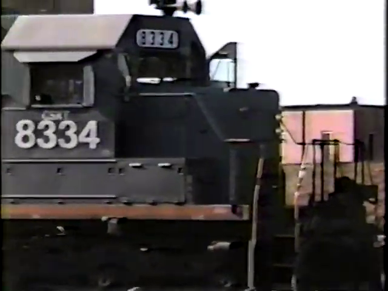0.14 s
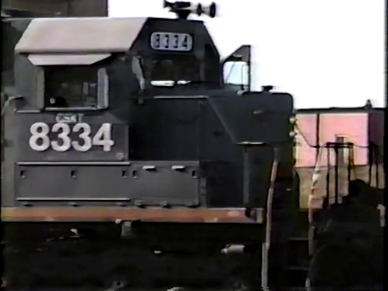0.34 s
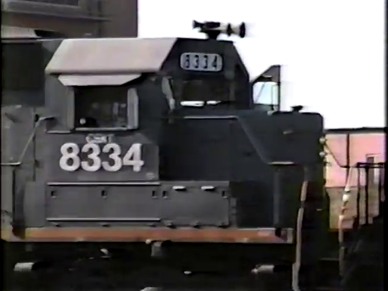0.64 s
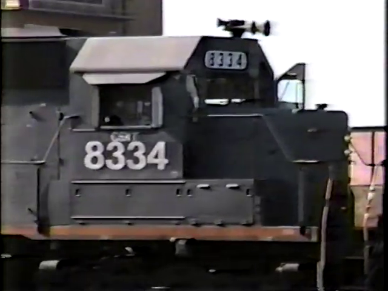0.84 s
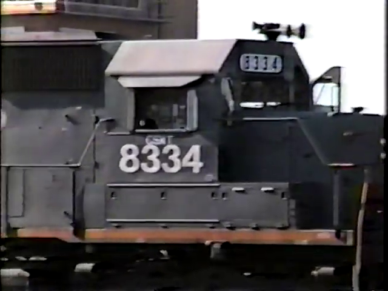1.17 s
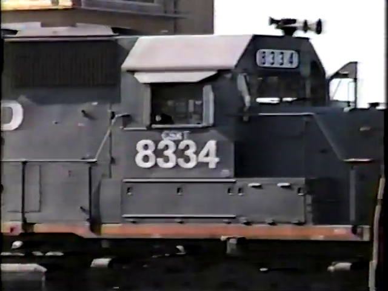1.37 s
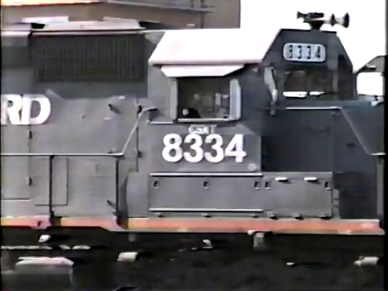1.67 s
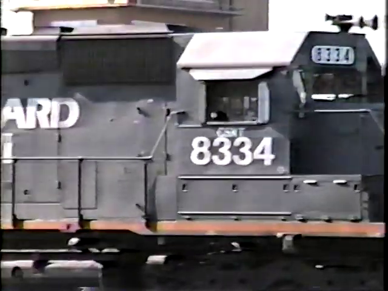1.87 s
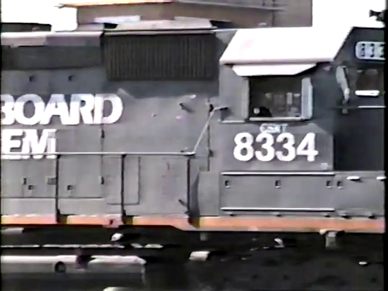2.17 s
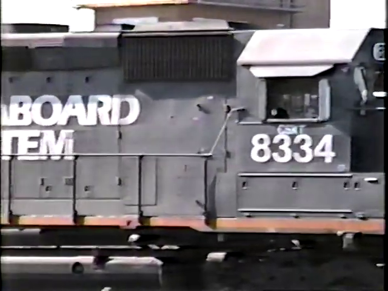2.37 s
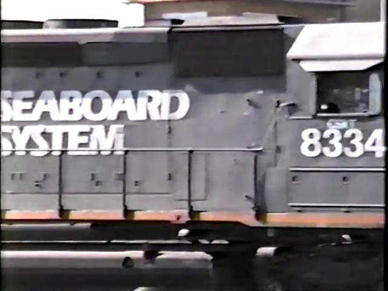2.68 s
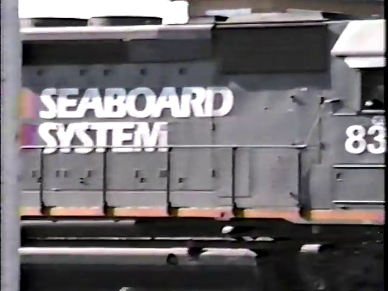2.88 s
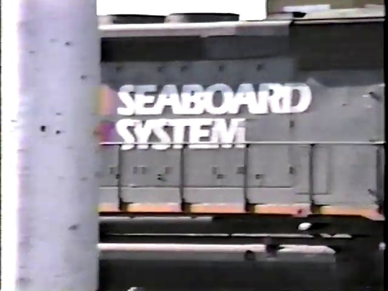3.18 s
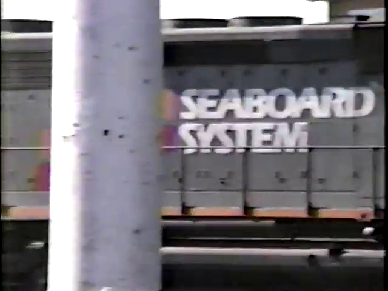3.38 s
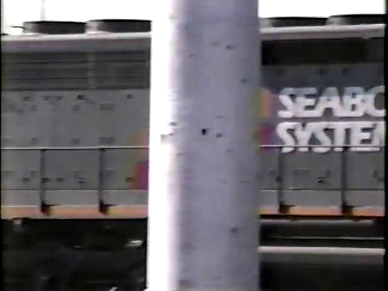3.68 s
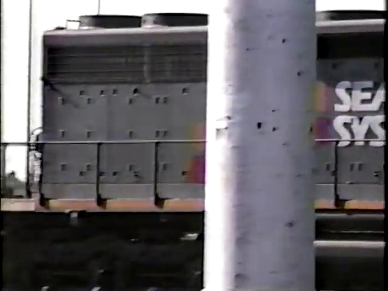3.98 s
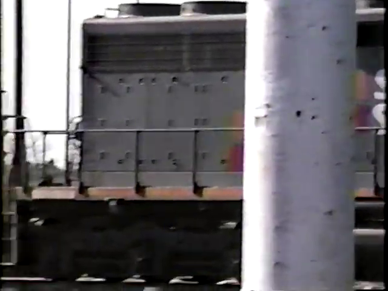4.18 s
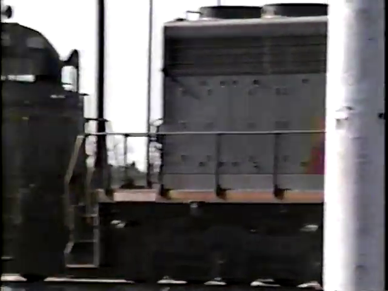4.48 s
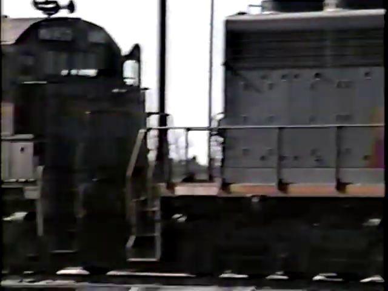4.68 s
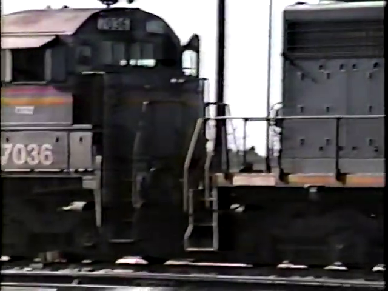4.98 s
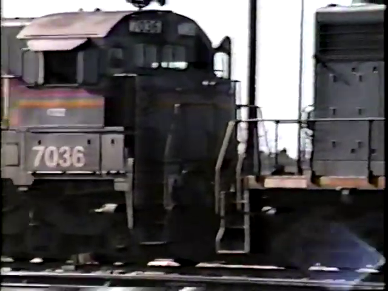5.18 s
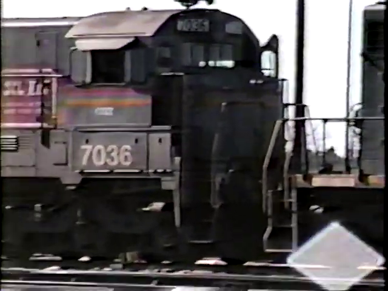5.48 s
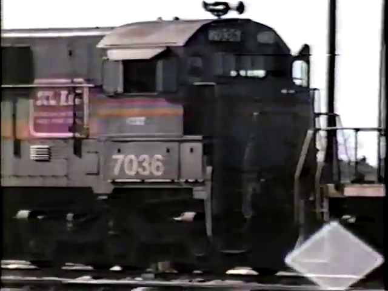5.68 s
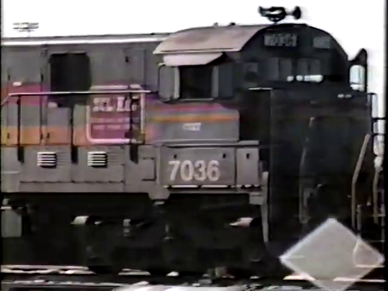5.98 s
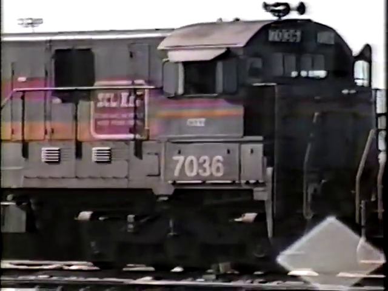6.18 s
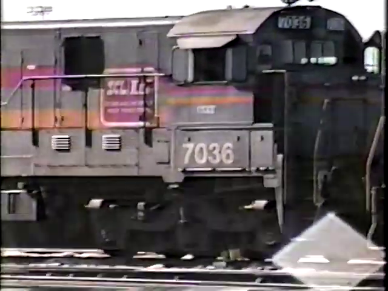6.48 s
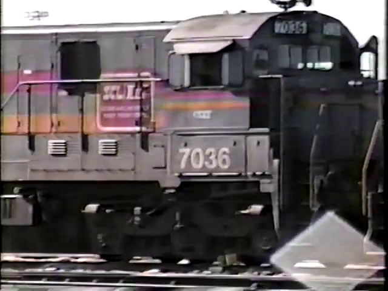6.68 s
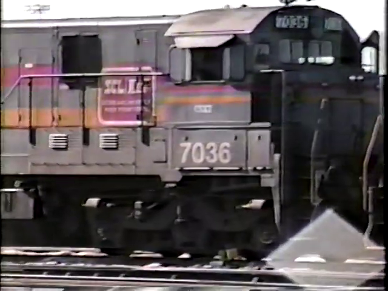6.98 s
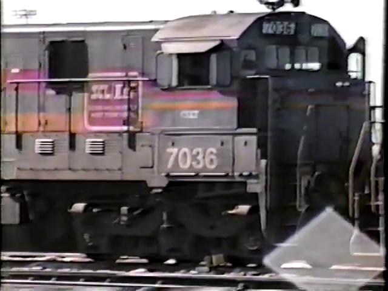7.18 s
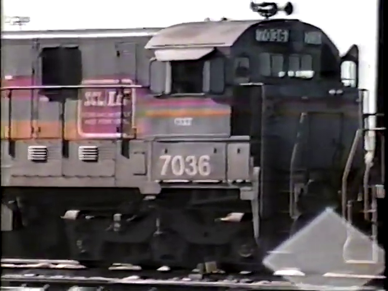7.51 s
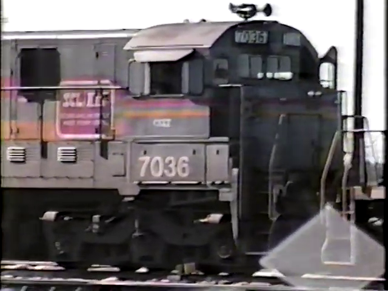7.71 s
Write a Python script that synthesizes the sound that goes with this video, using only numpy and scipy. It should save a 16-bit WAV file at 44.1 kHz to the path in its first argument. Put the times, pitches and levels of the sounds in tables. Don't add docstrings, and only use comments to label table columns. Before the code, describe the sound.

Steady rattling engine roar and throbbing turbine-like whine from idling diesel locomotives, with hissing air, a brief sputtering puff and sparse valve ticks.

```python
import sys
import numpy as np
from scipy import signal
from scipy.fft import rfft, irfft, next_fast_len
from scipy.io import wavfile
from scipy.ndimage import uniform_filter1d, map_coordinates

SR = 44100
rng = np.random.default_rng(int(sys.argv[2]) if len(sys.argv) > 2 else 0)


def store_pcm(level_fs):
    pcm = np.round(np.clip(level_fs, -1, 1) * 32767).astype(np.int16)
    wavfile.write(sys.argv[1], SR, np.atleast_2d(pcm).T)


def level_to_linear(level):
    exponent = np.asarray(level, float) / 20
    return 10 ** exponent


N = 346185
T = np.arange(N) / SR
SHAFT_HZ = 4.171


def unit(x):
    return x / np.sqrt(np.mean(np.abs(x) ** 2) + 1e-20)


def curves(rows):
    s, *cols = np.transpose(rows)
    return [np.interp(T, s, c) for c in cols]


def bumps(times, widths):
    return np.exp(-((T - np.c_[times]) / np.c_[widths]) ** 2)


def wobble(rate):
    knots = rng.standard_normal(int(N * rate / SR) + 4)
    return map_coordinates(knots, [T * rate])


def noise(spectrum, repeat=0):
    m = next_fast_len(N + SR)
    hz = np.fft.rfftfreq(m, 1 / SR)
    f, db = np.transpose(spectrum)
    colour = level_to_linear(np.interp(np.log(hz + 1), np.log(f + 1), db, -120, -120))
    comb = 1 / (1 - np.clip(repeat, 0, .97) * np.exp(-2j * np.pi * hz / SHAFT_HZ))
    white = rfft(rng.standard_normal(m))
    return unit(irfft(white * colour * comb, m)[:N])


def blur(width_hz):
    return unit(wobble(width_hz) + 1j * wobble(width_hz))


def line(hz, db, gain):
    return level_to_linear(db) * np.sqrt(2) * np.real(gain * np.exp(2j * np.pi * hz * T))


# (time [s], engine effort [dB], air leak pressure [dB])
YARD_EFFORT = [(0, 0, 0.5), (.7, 1, 1), (1.24, 0, -1), (1.71, .5, 2), (2.19, -.5, -0.5), (3.5, -.5, 0),
               (3.8, -0.5, -4), (4.1, 0, -1.5), (5.1, 0.5, -1), (5.5, 0.5, -1), (6.43, 1, 3.5),
               (6.6, -.5, -1.5), (7.26, 2, 2), (7.85, 1.5, -0.5)]


def engine():
    effort_db, leak_db = curves(YARD_EFFORT)
    moving = shaft(effort_db) + roar(effort_db) + fans(effort_db, leak_db)
    return exhaust(effort_db) + moving + leaking_air(leak_db)


# (frequency [Hz], level [dB per Hz])
EXHAUST_COLOUR = [(13, -50.5), (22, -29), (75, -0.5), (156, -2.5), (204, -6), (261, -5), (368, -6),
                  (452, -7.5), (470, -1), (610, -31), (1030, -120)]
# (time [s], extra level [dB], half width [s])
EXHAUST_BEATS = [
    (.35, 2.5, .05),
    (1.19, 1.5, 0.046),
    (3.21, 3.5, .05),
    (3.39, 4.5, .05),
    (4.9, 1, .05),
    (5.68, 2.5, .05),
    (6.6, 4, .12),
    (7.6, -1.5, 0.25),
]


def exhaust(effort_db):
    s, beat_db, half_width = np.transpose(EXHAUST_BEATS)
    level_db = -38 - .3 * effort_db + beat_db @ bumps(s, half_width)
    return level_to_linear(level_db) * (noise(EXHAUST_COLOUR) + level_to_linear(-5) * noise(EXHAUST_COLOUR, repeat=.85))


# (frequency [Hz], level [dB per Hz])
BLOCK_COLOUR = [(200, -58.5), (250, -15.5), (320, -17), (478, -15.5), (490, -2.5), (600, -2.5), (645, -2.5),
                (690, -3.5), (725, -0.5), (745, -6.5), (790, -3), (830, -11), (980, -16), (1100, -20),
                (1400, -40)]


def shaft(effort_db):
    turning = level_to_linear(-30 + .8 * effort_db) * noise(BLOCK_COLOUR, repeat=.92) + gears()
    hunting = T + .00022 * wobble(2.6)
    return map_coordinates(turning, [hunting * SR], mode="nearest")


# (frequency [Hz], level [dB rms], smear width [Hz], steady share)
GEAR_LINES = [(404, -51, 0.92, 1.2), (991, -45, 6, 0.96), (1190, -45, 7, 0.34), (1500, -48, 10, 0.33),
              (1637, -40, 25, .2), (1671, -43.5, 18, 0.17), (3550, -48.5, 50, .1)]


def gears():
    turns = 2 * np.pi * SHAFT_HZ * T
    cam_teeth, runout = 158, 1.1
    cam = level_to_linear(-35.5) * np.sqrt(2) * np.sin(cam_teeth * turns + runout * np.sin(turns))
    throb = 1 + .7 * np.cos(np.pi * SHAFT_HZ * (T - .2))
    out = cam + throb * line(493, -43, unit(2 + blur(3)))
    for hz, db, width, steady in GEAR_LINES:
        out += line(hz, db, unit(steady + blur(width)))
    return out


# (frequency [Hz], level [dB per Hz])
ROAR_COLOUR = [(380, -51.5), (476, -10.5), (495, -6), (800, -2.5), (900, -1), (1300, 0.5), (1800, -1.5),
               (2050, 2.5), (2150, 8), (2260, 1.5), (2500, -22.5), (3000, -50)]


def roar(effort_db):
    return level_to_linear(-25.5 + .8 * effort_db + .67 * wobble(7.5)) * noise(ROAR_COLOUR)


# (frequency [Hz], level [dB per Hz])
FAN_COLOUR = [(1350, -24.5), (2300, -4.5), (2460, -5), (2930, -8.5), (3460, -10), (4070, -12.5),
              (4400, -11), (4700, -24), (6110, -46), (10300, -120)]


def fans(effort_db, leak_db):
    level_db = -32.5 + .73 * effort_db + .3 * leak_db + .67 * wobble(9)
    return level_to_linear(level_db) * noise(FAN_COLOUR)


# (frequency [Hz], level [dB per Hz])
AIR_COLOUR = [(2650, -29), (4500, -4.5), (4660, -3.5), (5350, -10.5), (7080, -14.5), (8020, -23.5),
              (10500, -36), (13600, -64), (22000, -120)]


def leaking_air(leak_db):
    return level_to_linear(-46 + leak_db + .77 * wobble(7)) * noise(AIR_COLOUR)


# (time [s], load [dB], steady tone between swells relative to load [dB], octave relative to load
# [dB])
BLOWER_LOAD = [(0, -23.5, -19, -27), (.55, -24, -11, -20.5), (.8, -22.5, -12, -18.5),
               (1.3, -26.5, -8, -23.5), (1.8, -25, -9, -18), (2.2, -25.5, 1, -20), (2.7, -24.5, -12, -21),
               (3.2, -24.5, -15, -17), (3.7, -27.5, -3, -22.5), (4.2, -27.5, -6, -22), (4.5, -25, -6, -23),
               (5, -30, -11, -23), (5.35, -27.5, -15, -21), (5.8, -32.5, 6, -13.5), (6.3, -26, -0.5, -16.5),
               (6.9, -27, 2, -19.5), (7.45, -25.5, -5.5, -21), (7.85, -22, 2, -21)]


def whine():
    load_db, lull_db, octave_db = curves(BLOWER_LOAD)
    first_s, turn_s, swell_s = .074, .2402, .135
    count = int(N / SR / turn_s) + 2
    chance = rng.standard_normal((count, 2))
    middle = first_s + turn_s * np.arange(count) + .004 * chance[:, 0]
    turn = np.round((T - first_s) / turn_s).astype(int)
    since_s = T - middle[turn]
    u = since_s / swell_s
    loaded = 1 / (1 + (2 * u) ** 6)
    climb = uniform_filter1d(np.where(np.abs(u + .05) < .7, u, 0), size=400)
    mesh_hz = 2175 + 1.4 * T + 36 * climb + 5 * wobble(30)
    angle = 2 * np.pi * np.cumsum(mesh_hz) / SR
    quarters = 1 - (.38 - .025 * T) * np.cos(8 * np.pi * SHAFT_HZ * (since_s + .005))
    mesh_rough = unit(1 + .25 * blur(50))
    octave_rough = unit(1 + .75 * blur(110))
    lull = level_to_linear(load_db + lull_db - 2.5) * (1 - loaded) * unit(.96 + blur(60)) * np.exp(2j * np.pi * 2182 * T)
    mesh = level_to_linear(load_db + .5 + .8 * chance[turn, 1]) * loaded * quarters * mesh_rough
    bites = .15 + 1.35 * np.exp(-((u + .16) / .2) ** 2) + .9 * np.exp(-((u - .24) / .17) ** 2)
    octave = level_to_linear(load_db + octave_db + 3) * bites * octave_rough
    whole = mesh * np.exp(1j * angle) + lull + octave * np.exp(1j * 1.981 * angle)
    return np.sqrt(2) * np.real(whole)


# (frequency [Hz], level [dB per Hz])
HISS_COLOUR = [(5000, -25), (8500, -2.5), (9880, -10.5), (15200, -8.5), (15730, -10), (15760, -120)]
# (frequency [Hz], level [dB rms])
SCAN_WHISTLES = [(8629, -81.5), (9351, -84), (10072, -83), (10788, -79.5), (11509, -81.5), (12225, -81),
                 (12586, -91), (12947, -85), (13668, -86.5), (14029, -89), (14384, -86), (15106, -87.5),
                 (15466, -83), (15735, -82.5)]


def camera_noise():
    out = level_to_linear(-65.5) * noise(HISS_COLOUR)
    for hz, db in SCAN_WHISTLES:
        out += line(hz, db, unit(4 + blur(6)))
    return out


# (frequency [Hz], level [dB per Hz])
NOZZLE_COLOUR = [(2200, -33), (2700, 3), (3300, -1), (3900, 4), (4600, -1.5), (5200, -6), (5500, -16),
                 (7500, -23), (9000, -36.5)]
# (time [s], rush [dB], bright hiss [dB], half width [s])
AIR_PUFFS = [
    (.07, -41, -54, .04),
    (.375, -42, -43, .01),
    (.5, -32.5, -46, 0.033),
    (.58, -36, -45, 0.01),
    (.72, -48, -52, .04),
]


def air_line():
    def passed(s, soft_s):
        return .5 + .5 * np.tanh((T - s) / soft_s)

    cut_s = .59
    snapped = passed(cut_s, .008)
    build_db = -32 + 38 * np.minimum(T - cut_s, 0)
    build = level_to_linear(build_db) * passed(.22, .04) * (1 - snapped)
    linger = level_to_linear(-43) * snapped * (1 - passed(.67, .03))
    flow = build + linger
    s, rush_db, bright_db, half_width = np.transpose(AIR_PUFFS)
    puffs = bumps(s, half_width)
    rush = level_to_linear(1.5 * wobble(40)) * (flow + level_to_linear(rush_db) @ puffs) * noise(NOZZLE_COLOUR)
    bright = (level_to_linear(-17) * flow + level_to_linear(bright_db) @ puffs) * noise(AIR_COLOUR)
    return rush + bright


# (time [s], peak level [dB], pitch [Hz])
VALVE_TICKS = [(0.5893, -27, 2880), (1.1044, -25.5, 2720), (3.5832, -34, 2930), (4.0078, -24, 2720),
               (4.272, -26, 2910), (5.044, -26, 2760), (5.061, -18.5, 2780), (5.3226, -25, 2860),
               (5.8527, -25, 2740), (6.108, -24, 2770), (6.6386, -23.5, 2780)]
# (time [s], peak level [dB], pitch [Hz])
FITTING_CLINKS = [
    (.49, -29, 5010),
]
# (ratio to the tick's pitch, level [dB])
CAP_MODES = [(.84, -3), (.89, 0), (.97, -5), (1, 1.5), (1.035, -5), (1.07, -10.5)]


def valve():
    events = [*VALVE_TICKS, *FITTING_CLINKS]
    out, t = np.zeros(N + SR), np.arange(SR // 5) / SR
    chance = rng.standard_normal((len(events), len(CAP_MODES)))
    shape = level_to_linear(-60 * t / .09) * (1 - np.exp(-(t / .002) ** 2))
    for (s, db, hz), spread in zip(events, chance):
        ring = 0
        for (ratio, level), d in zip(CAP_MODES, spread):
            ring = ring + level_to_linear(level + d) * np.sin(2 * np.pi * ratio * hz * t + 3 * d)
        out[round(s * SR) - 60:][:len(t)] += level_to_linear(db - 4) * shape * ring
    return out[:N]


def scene():
    return (engine() + whine() + air_line() + valve())[None]


def roll_off(x):
    return signal.sosfilt(signal.butter(12, 16800, fs=SR, output="sos"), x)


def record(dry):
    splice = np.clip(np.minimum(T, T[::-1]) / .001, 0, 1)
    return roll_off(splice * dry + camera_noise())


dry = scene()
out = record(dry)
store_pcm(out)
```